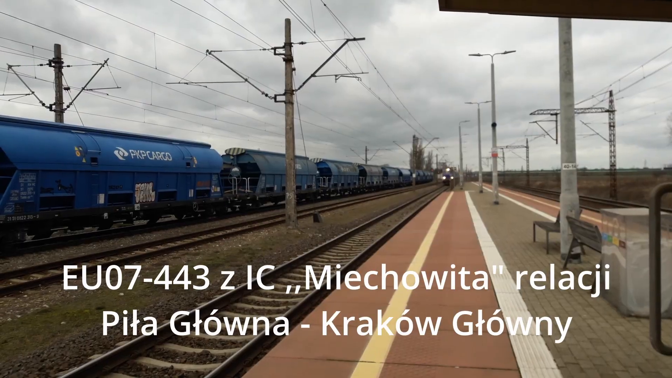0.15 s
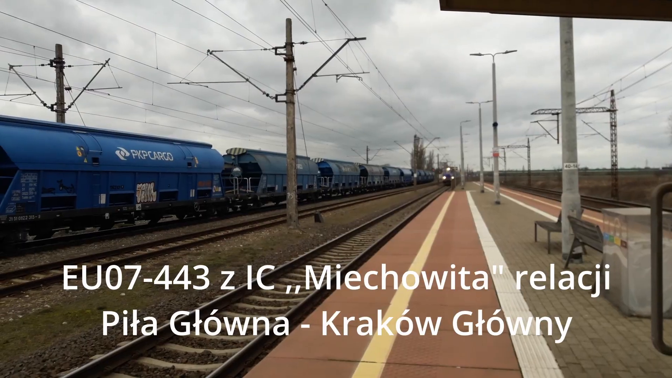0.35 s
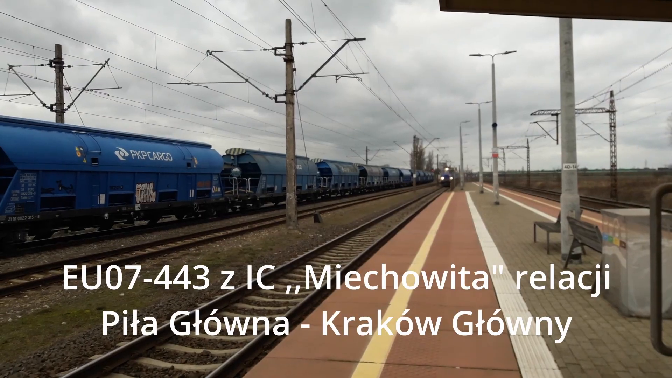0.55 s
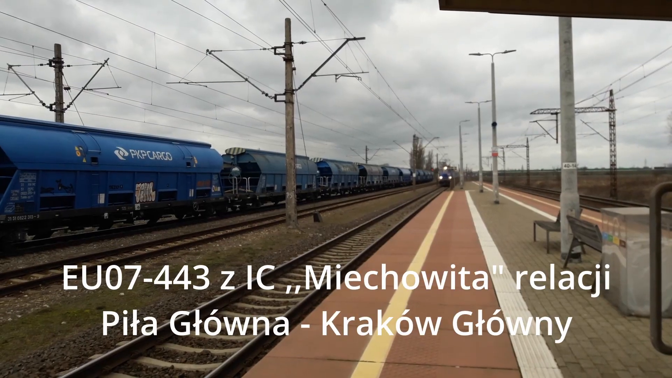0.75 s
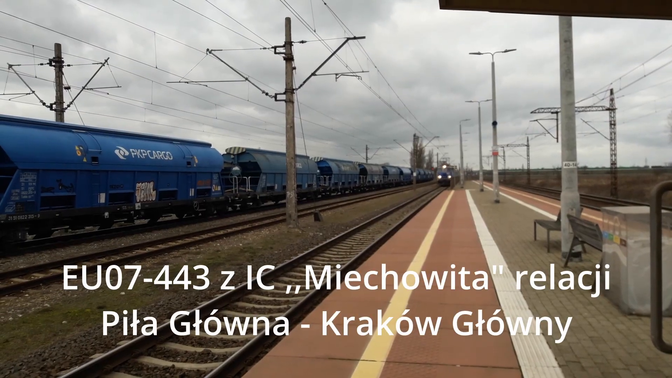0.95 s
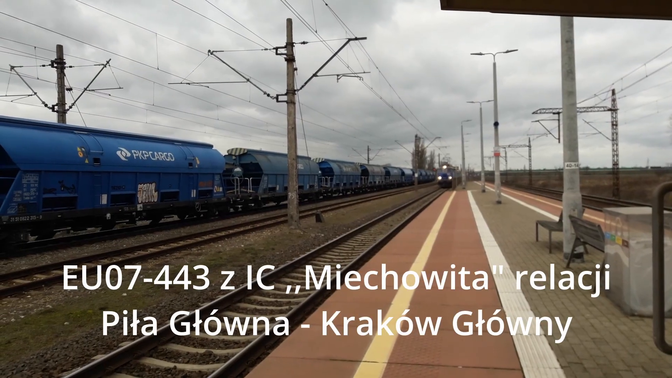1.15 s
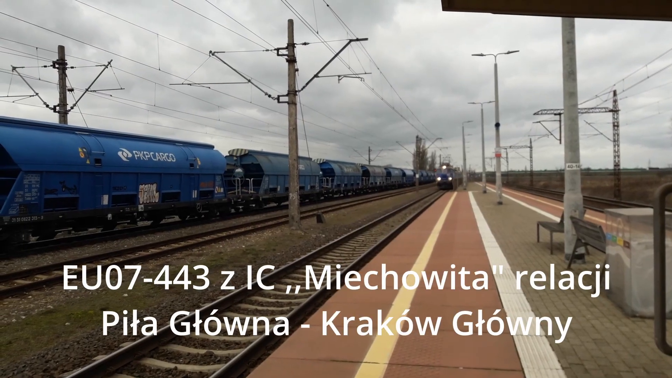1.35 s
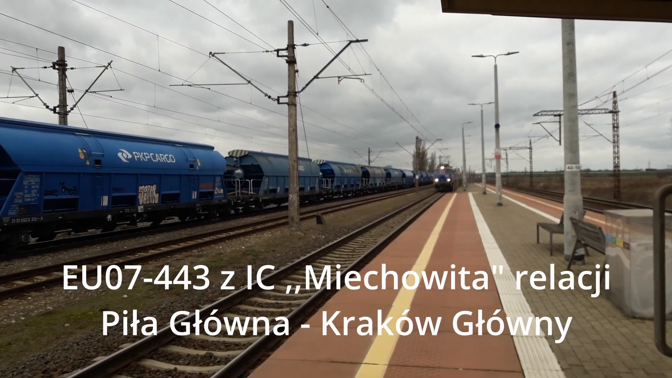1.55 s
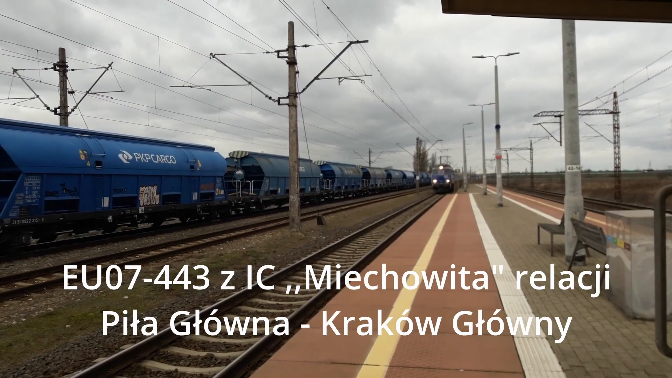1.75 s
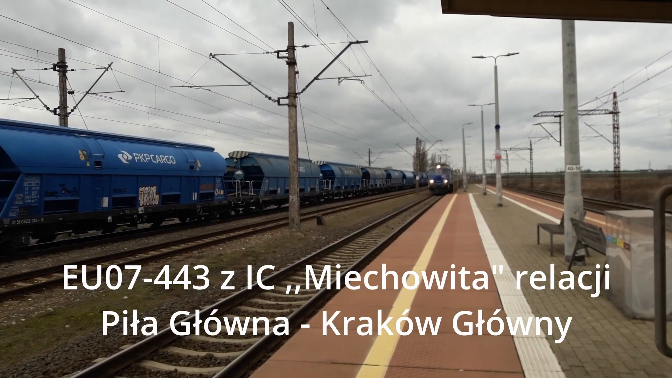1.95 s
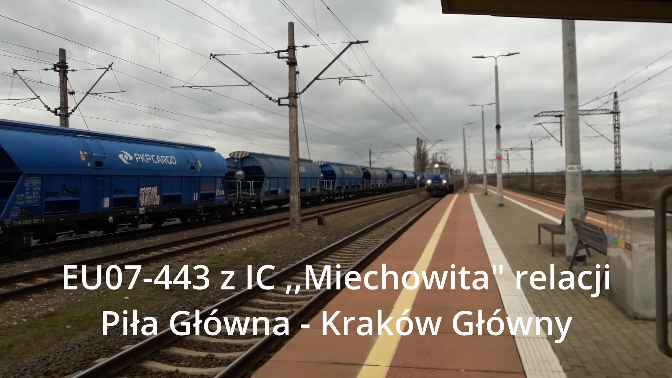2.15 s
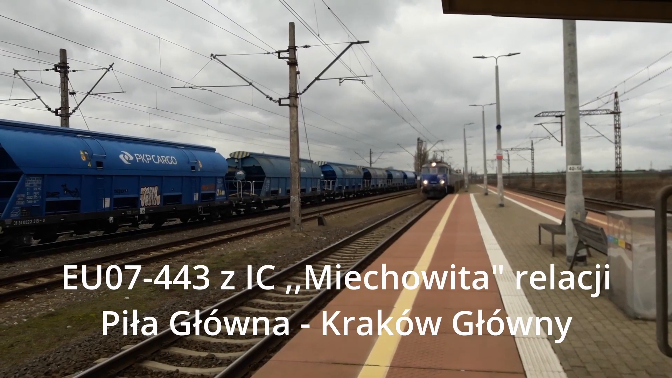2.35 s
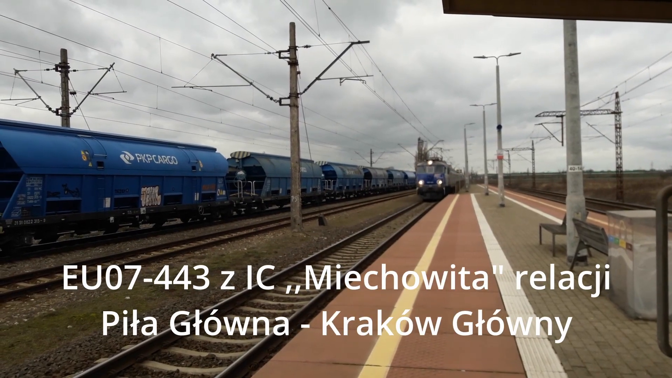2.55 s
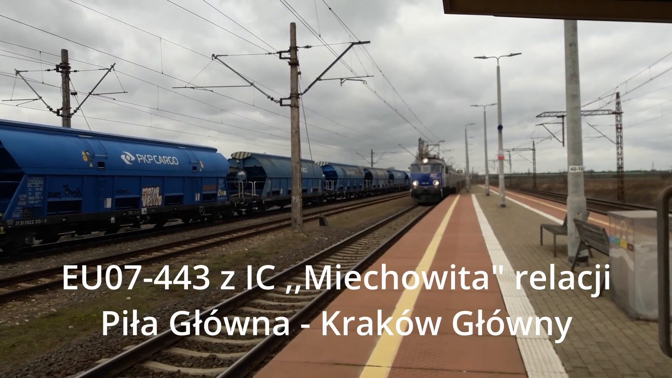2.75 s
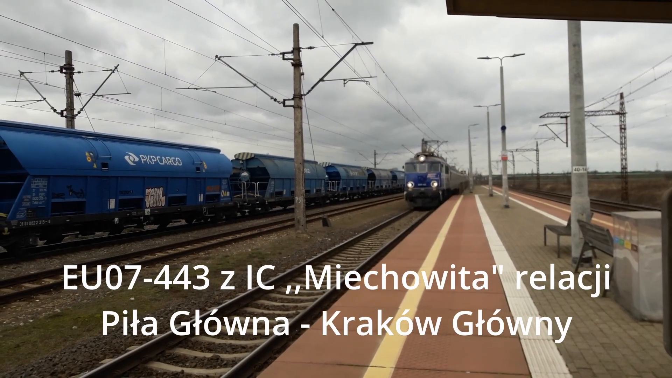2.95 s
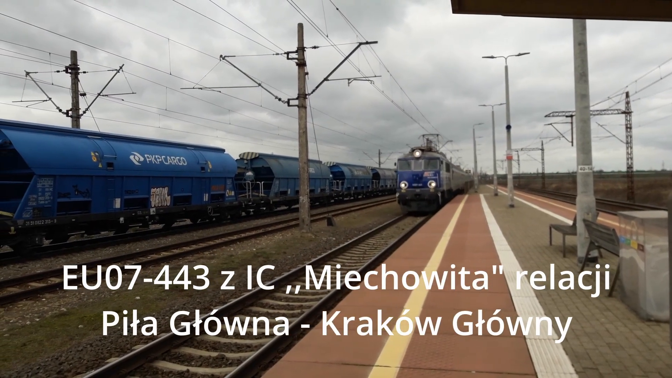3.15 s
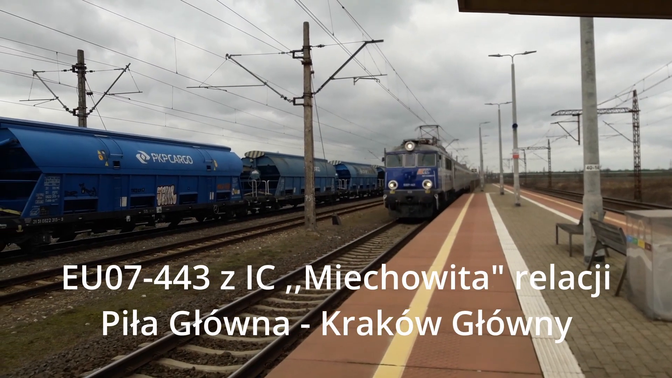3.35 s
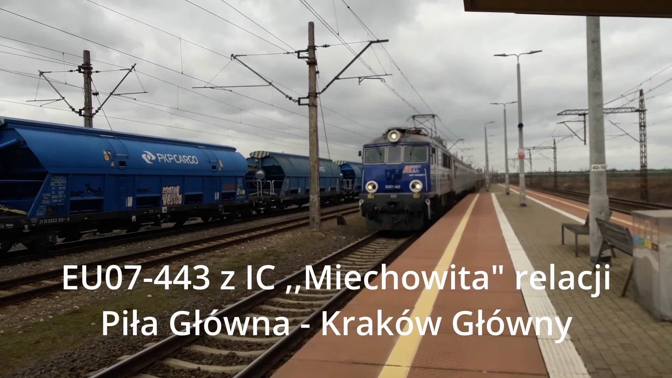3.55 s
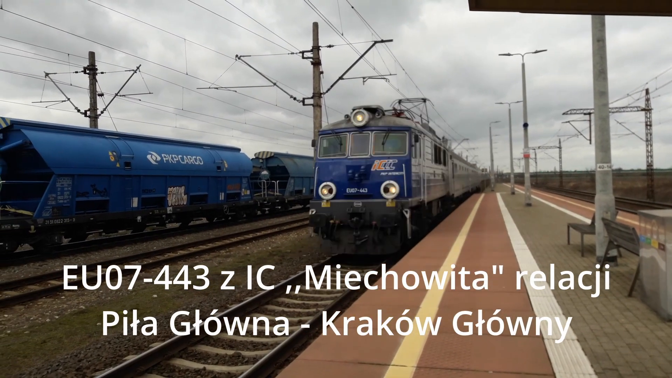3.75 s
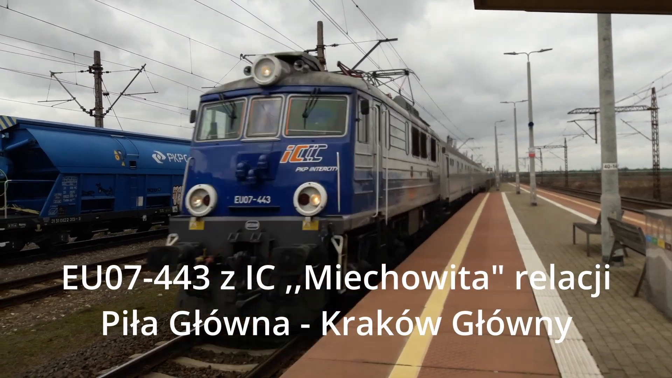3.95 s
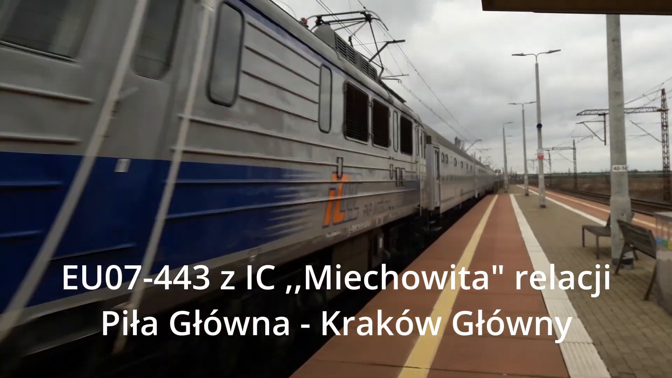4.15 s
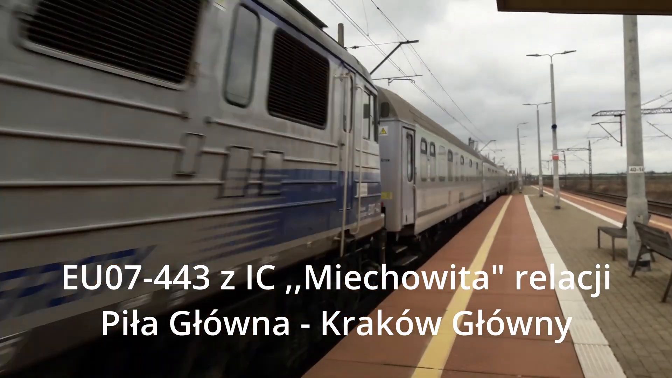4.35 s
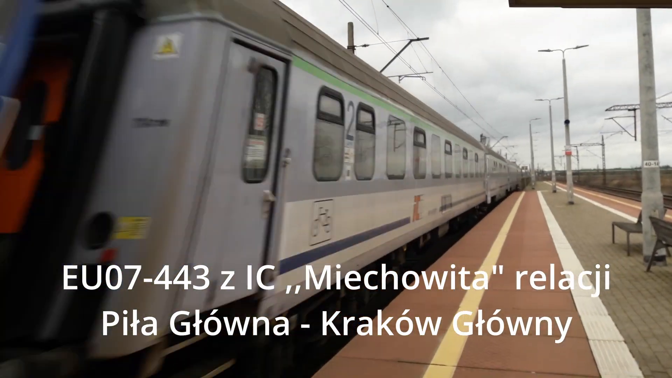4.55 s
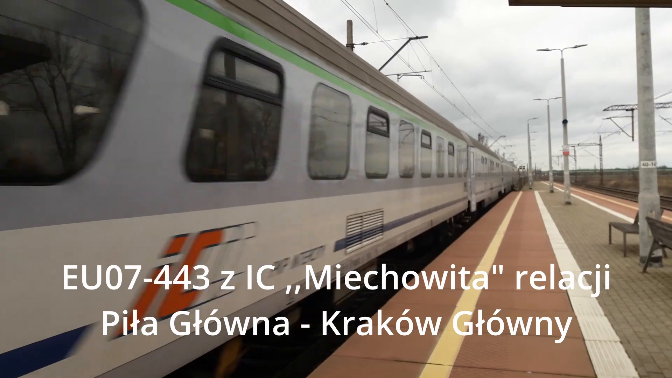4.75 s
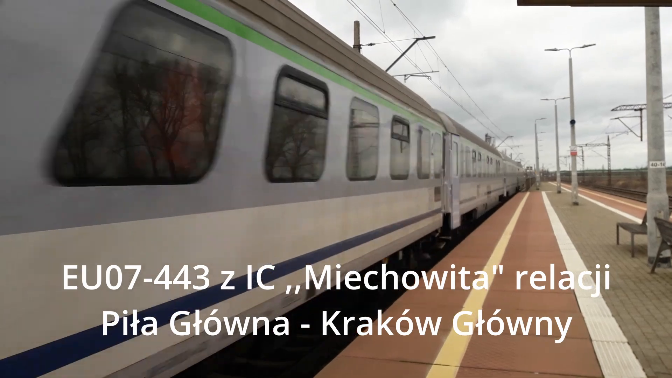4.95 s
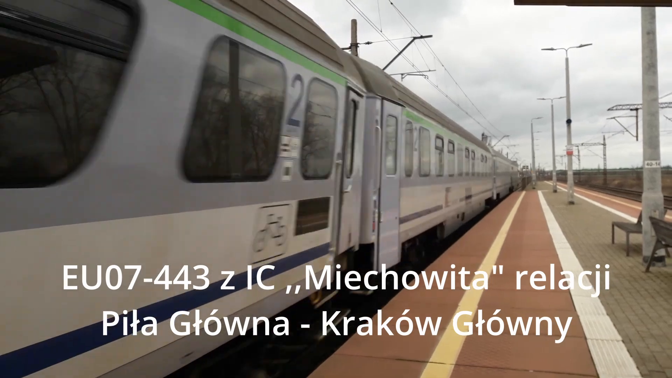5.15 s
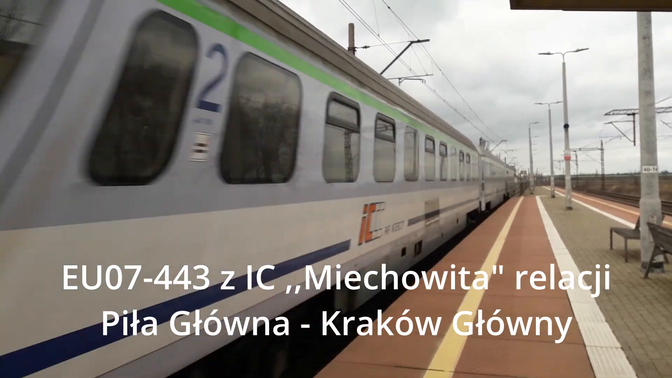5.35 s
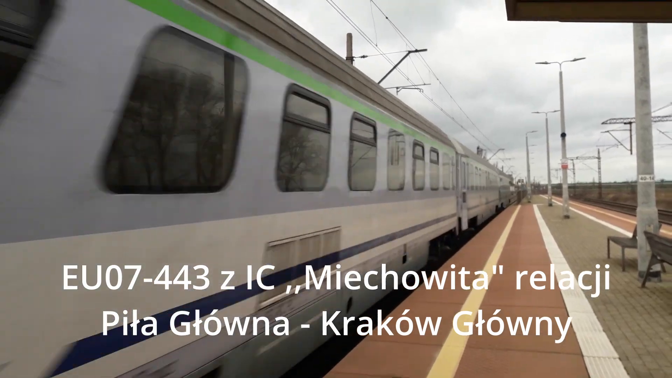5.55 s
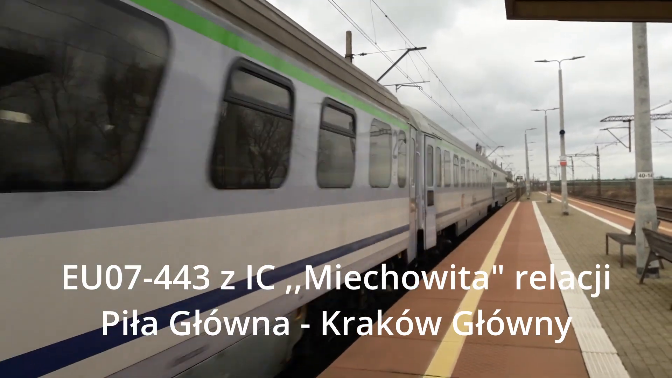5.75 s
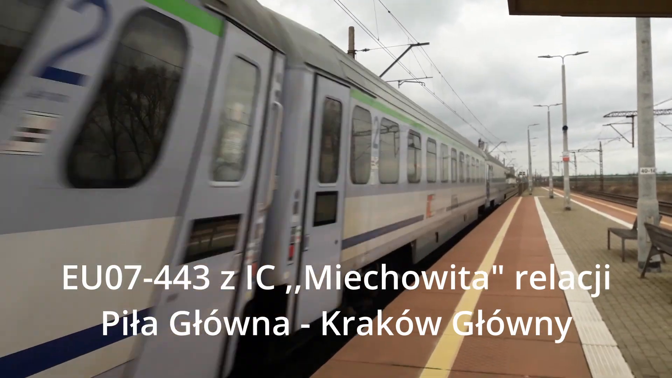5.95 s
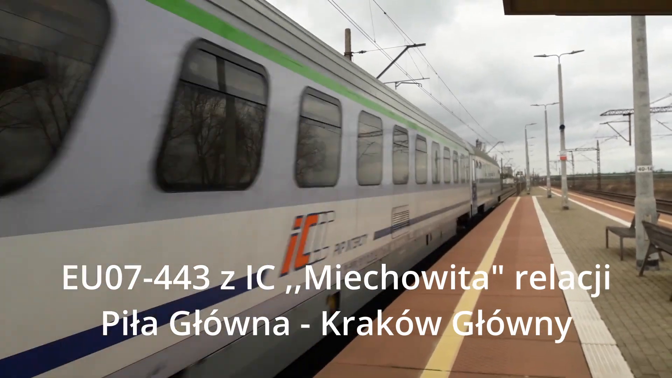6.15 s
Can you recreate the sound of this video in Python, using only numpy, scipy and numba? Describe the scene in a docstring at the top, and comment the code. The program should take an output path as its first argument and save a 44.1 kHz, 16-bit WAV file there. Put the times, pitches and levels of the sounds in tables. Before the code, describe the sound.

Outdoors on a station platform, close to the rails, centred identical sound in both channels. From 0 to 2.5 seconds a breeze rumbles softly, with sharp low thumps around 0.1-0.2, 0.6-0.7, 1.0 and 1.6. Beneath it the rails sing a thin, very high steely hiss with a faint whistle, and a distant resonant track hum grows. From 2.5 to 4 the singing thickens and the hum broadens into a rapidly rising roar. Around 4 the electric locomotive arrives; its two heavy bogies ring and growl past near 4.2-4.5, the fullest rolling moment, with pitch bending down. From 4.8 the lighter coaches roar a little less, bogies sweeping by in hissing metallic surges near 4.9, 5.4, 5.6 and in close succession from 6.0. Slipstream gusts buffet the microphone, with thuds at 4.6 and 5.4-5.6 and the hardest blow at 5.75, briefly ducking everything. It ends at about 6.4, train still passing.

```python
"""A breeze puffs and thumps at the microphone while rails sing ever louder ahead of an express that rushes past.
Filtered noise makes the breeze, the slipstream, the singing rails, the roaring track and the hiss of the bogies.
Each bogie of the electric train sweeps by about three metres away; its wheels ring as resonant noise
that travel time bends down in pitch.
Single eddies are pressure pulses, and a limiter ducks under the strongest blows."""
import sys
import numpy as np
from scipy import signal
from scipy.fft import rfft, irfft
from scipy.io import wavfile
from scipy.ndimage import uniform_filter1d, minimum_filter1d, map_coordinates
from numba import njit

SR = 44100
rng = np.random.default_rng(int(sys.argv[2]) if len(sys.argv) > 2 else 0)


def materialize(psi):
    """Save the field psi as 16-bit PCM at rate SR to the path in sys.argv[1].

    A 1-D psi becomes a single channel; in a 2-D psi each row is a channel.
    """
    bounded = np.clip(np.atleast_2d(psi).T, -1, 1)
    quanta = np.round(bounded * 32767).astype(np.int16)
    wavfile.write(sys.argv[1], SR, quanta)


N = 277830
TIME = np.arange(N) / SR  # s
FREQS = np.maximum(np.arange(N // 2 + 1) * SR / N, 1)  # Hz

SPEED = 33  # m/s
ARRIVES_S, COACHES_S = 4, 4.81  # the locomotive's nose arrives, then the first coach


def undb(db):
    """Decibels to gain."""
    return 10 ** (np.asarray(db) / 20)


def colour(points):
    """Gain per frequency through (Hz, dB) points, joined on a logarithmic frequency scale."""
    hz, db = np.transpose(points)
    return undb(np.interp(np.log(FREQS), np.log(hz), db))


def resonances(modes):
    """Gain per frequency of steep-sided resonances, added as power."""
    power = 0
    for hz, width_hz, db in modes:
        peak = undb(db) / (1 + 2 * ((FREQS - hz) / width_hz) ** 2)
        power = power + peak ** 2
    return np.sqrt(power)


def ripple(spacing_hz, depth_db):
    """Gain per frequency of many narrow, unevenly strong modes of steel."""
    grid_hz = np.arange(1024) * spacing_hz
    strength = rng.standard_normal(len(grid_hz))
    return undb(depth_db * np.interp(FREQS, grid_hz, strength))


def noise(gain):
    """Random excitation through a response, rms 1."""
    shaped = irfft(rfft(rng.standard_normal(N)) * gain, N)
    return shaped / shaped.std()


def waver(rate_hz, depth_db):
    """A gain that wanders at random, mostly slower than rate_hz; depth_db is rms."""
    coarse = TIME[::32]
    hz = np.fft.rfftfreq(len(coarse), coarse[1])
    spectrum = rfft(rng.standard_normal(len(coarse))) / (1 + (hz / rate_hz) ** 4)
    slow = irfft(spectrum, len(coarse))
    return np.interp(TIME, coarse, undb(depth_db * slow / slow.std()))


def swells(table):
    """Summed gain of rounded bursts, each at half its peak gain half a length from its middle."""
    return sum(undb(db) / (1 + (2 * (TIME - s) / length) ** 6) for s, length, db in table)


def after(s, fade_s):
    """A smooth step from 0 to 1 around time s."""
    return .5 + .5 * np.tanh((TIME - s) / fade_s)


# puffs of the breeze: middle_s, length_s, level_db
PUFFS = [(.155, 0.075, -30.5), (.54, .19, -33.5), (.86, 0.31, -35), (1.0, 0.063, -31.5),
         (1.42, 0.071, -36.5), (1.64, .12, -28), (1.8, 0.061, -33), (2.05, 0.24, -42), (2.26, 0.055, -31.5),
         (2.51, 0.05, -27.5)]
# relative spectrum of the breeze: freq_hz, level_db
WIND_COLOUR = [(20, -32), (40, -18), (65, -1), (100, 4), (150, 2), (240, -10), (400, -23), (800, -32),
               (2000, -65)]


def breeze(near):
    """Turbulence rumbles in fits: steady air, puffs, and a draught that grows with the train and lasts."""
    steady = undb(-44) * waver(10, 2.2)
    draught = undb(-33.5) * near ** 0.37
    strength = steady + draught + swells(PUFFS)
    return noise(colour(WIND_COLOUR)) * waver(33, 2.3) * strength


# gusts of the slipstream: middle_s, length_s, level_db
GUSTS = [(4.17, 0.6, -24.5), (4.65, 0.14, -12.5), (5.165, 0.028, -20.5), (5.445, 0.06, -17.5),
         (5.58, 0.16, -16.5), (5.755, 0.042, -11.5), (5.81, 0.028, -17), (6.0, 0.75, -28.5)]
# relative spectrum of the gusts: freq_hz, level_db
GUST_COLOUR = [(25, -30), (50, -6), (90, 1), (160, 1), (260, -3), (420, -6.5), (750, -8.5), (1500, -33),
               (3000, -61)]


def slipstream():
    """Turbulent air around the train buffets the microphone in bursts."""
    return noise(colour(GUST_COLOUR)) * waver(44, 2.95) * swells(GUSTS)


# single eddies that thump the microphone: middle_s, peak_db, pitch_hz
EDDIES = [(.109, -22, 110), (0.141, -16.5, 150), (0.16, -26, 200), (0.1722, -10.5, 182), (0.216, -20, 237),
          (0.602, -21, 133), (0.717, -17, 160), (0.986, -24, 200), (0.999, -15, 155), (1.641, -14, 224),
          (1.659, -18, 89), (1.967, -21, 160), (4.612, -6, 119), (5.162, -15, 190), (5.431, -7.5, 140),
          (5.529, -9, 220), (5.626, -12, 202), (5.7386, 2.5, 93), (5.749, -1, 130), (5.764, -4.5, 140)]


def eddies():
    """Each strong eddy is one push and pull of pressure."""
    thumps = np.zeros(N)
    for s, db, hz in EDDIES:
        turn = 2 * np.pi * hz * (TIME - s)
        thumps -= undb(db) * turn * np.exp((1 - turn ** 2) / 2)
    return thumps


# high waves that run far along the rails, relative levels: freq_hz, width_hz, level_db
RAIL_MODES = [(3900, 540, -14.5), (4600, 180, -16), (5580, 150, -15), (6700, 190, -8.5), (7120, 260, -9.5),
              (8650, 400, -16), (9250, 350, -7), (9570, 160, 0.5), (10100, 220, -34)]
# the highest rail waves, which carry furthest, relative levels: freq_hz, level_db
RAIL_TOP = [(7900, -37), (8500, -3), (10300, -8), (11500, -14.5), (13700, -24), (16000, -26)]
# relative spectrum of the rails when the train is near: freq_hz, level_db
RAIL_HISS = [(2500, -6), (5000, -11.5), (6100, -7.5), (7000, -8), (7700, -7.5), (8600, 0), (9600, 0.5),
             (10300, -7.5), (11500, -16.5), (13500, -29), (16000, -36)]


def rails(near):
    """Only lightly damped waves get far along the steel; the gaps between them fill as the train nears."""
    hiss_share = np.clip((near * 4.1) ** 1.6 + 0.00056, 0, .97)
    modes = ripple(45, 1.0)
    far_waves = np.hypot(resonances(RAIL_MODES), undb(-7.5) * colour(RAIL_TOP))
    singing = noise(far_waves * modes) * undb(0.46)
    hiss = noise(colour(RAIL_HISS) * modes) * undb(4.0)
    whistle = noise(resonances([(9460, 55, 0)])) * waver(13, 1.5) * undb(-14) * np.sqrt(1 - near)
    blend = np.sqrt(1 - hiss_share) * singing + np.sqrt(hiss_share) * hiss
    return (blend + whistle) * waver(30, 0.59)


# relative spectrum of the track from afar: freq_hz, level_db
TRACK_FAR = [(150, -6.5), (300, -11), (450, -20), (600, -7.5), (1000, -9.5), (1600, -7.5), (2150, -5.5),
             (2400, -19), (2750, -19.5), (3000, -40), (5000, -29), (6000, -48)]
# resonances of rails on sleepers, relative levels: freq_hz, width_hz, level_db
TRACK_MODES = [(965, 43, -15), (1088, 18, 2.5), (1163, 25, 2.5), (1240, 55, 5), (1387, 81, 1.5),
               (1950, 190, -9.5)]
# damped sleeper resonances, which come up as the train nears, relative levels: freq_hz, width_hz, level_db
SLEEPER_MODES = [(607, 160, -10), (734, 50, 3.5), (1167, 19, -7)]
# relative spectrum of the track alongside: freq_hz, level_db
TRACK_NEAR = [(80, -26), (200, -3.5), (400, -6.5), (580, -5), (800, 1), (1100, -1.5), (1330, -5),
              (1650, -2), (2150, -1.5), (2500, -10.5), (3500, -47)]


def track(near):
    """Rough wheels shake rails and sleepers: distinct resonances from afar, a broad roar alongside."""
    far_response = np.hypot(colour(TRACK_FAR), resonances(TRACK_MODES))
    far = noise(far_response) * waver(20, 0.32) * undb(3.0)
    sleepers = noise(resonances(SLEEPER_MODES)) * waver(8.8, 2.0) * (near + 0.022) ** 0.47
    close = noise(colour(TRACK_NEAR)) * waver(6.1, 0.99) * undb(0.5)
    return np.sqrt(1 - near) * (far + sleepers) + np.sqrt(near) * close


# thin fizz of the wheel contacts, in bursts: middle_s, length_s, level_db
FIZZ = [(4.08, 0.27, -40), (5.43, 0.25, -41), (6.12, 0.53, -46)]
# relative spectrum of the fizz: freq_hz, level_db
FIZZ_COLOUR = [(8000, -20.5), (11000, 1.5), (13500, -7), (15500, 1)]


def contact_fizz():
    """The wheel contacts fizz thinly in bursts of very high noise."""
    return noise(colour(FIZZ_COLOUR)) * swells(FIZZ)


ROAR_DB, ROAR_COACH_DB = -14.5, -5  # level at the locomotive, change under the lighter coaches
ROAR_REACH_M, ROAR_LOSS_DB = 14.7, 25  # length of track that radiates, loss per tenfold distance
SINGING_DB, RAIL_REACH_M = -29.5, 80.3  # level as the train arrives, distance in steel that damps to 1/e
COVERED_DB, COVER_DELAY_S = -4, 0.19  # change once the train covers the rails, this long after the nose
SINGING_FIZZ_DB, FIZZ_FULL_DB = 2.5, -46  # lift by fizzing contacts, fizz level that gives most of it


def rolling(distance_m, near):
    """The roar spreads through the air and weakens with distance; steel damps the singing metre by metre."""
    spreading_db = ROAR_LOSS_DB * np.log10(np.hypot(1, distance_m / ROAR_REACH_M))
    roar_db = ROAR_DB - spreading_db + ROAR_COACH_DB * after(COACHES_S, 0.11)
    covered = after(ARRIVES_S + COVER_DELAY_S, .06)
    fizzing = np.tanh(swells(FIZZ) / undb(FIZZ_FULL_DB))
    singing_db = SINGING_DB + COVERED_DB * covered + SINGING_FIZZ_DB * fizzing
    singing_gain = undb(singing_db) * np.exp(-distance_m / RAIL_REACH_M)
    return track(near) * undb(roar_db) + rails(near) * singing_gain


# relative spectrum of the hiss around the bogies: freq_hz, level_db
RUSH_COLOUR = [(1200, -17.5), (2300, 1), (3200, 1.5), (4200, -2.5), (5500, -6.5), (6600, -15),
               (9000, -13.5), (11500, -32), (13500, -35), (15500, -32)]
RUSH_LEAD_M = 8  # the hiss peaks this far before a bogie is abreast
RUSH_LOCO_M, RUSH_COACH_M, RUSH_BEHIND_M = 13.4, 4.4, 10.9  # fades: ahead of loco, of coach, behind either


def rush(fall=1.77):
    """Wheels and air hiss from every bogie: it swells as the bogie nears and fades behind it."""
    power = 0
    for bogies, ahead_m in (LOCO_BOGIES, RUSH_LOCO_M), (COACH_BOGIES, RUSH_COACH_M):
        for abreast_s, *_, hiss_db in bogies:
            along_m = SPEED * (TIME - abreast_s) + RUSH_LEAD_M
            reach_m = np.where(along_m < 0, ahead_m, RUSH_BEHIND_M)
            power = power + undb(hiss_db) ** 2 / (1 + (along_m / reach_m) ** 2) ** fall
    return noise(colour(RUSH_COLOUR)) * waver(36, 0.12) * np.sqrt(power)


TRACK_OFFSET_M, SOUND_SPEED = 3.2, 343  # closest distance, m/s
WHEEL_TONE_HZ, WHEEL_TONE_WIDTH_HZ = 2090, 132  # upper wheel tone, before each bogie's pitch ratio


def bogie(abreast_s, ring_db, pitch_ratio, tone_db, modes, lead_m, reach_m):
    """Ringing wheels go by: travel time bends their pitch, and they are loudest just before they are abreast."""
    along_m = SPEED * (TIME - abreast_s)
    extra_path_m = np.hypot(along_m, TRACK_OFFSET_M) - TRACK_OFFSET_M
    arrival = TIME + extra_path_m / SOUND_SPEED
    emitted = np.interp(TIME, arrival, TIME)  # when the sound heard now left the wheels
    wheel_tone = (WHEEL_TONE_HZ, WHEEL_TONE_WIDTH_HZ, tone_db)
    wheels = resonances([*modes, wheel_tone]) * ripple(25.1, 1.8)
    ring = noise(wheels) * waver(23, 0.64)
    heard = map_coordinates(ring, [emitted * pitch_ratio * SR + SR], order=3, mode="wrap")
    # the platform edge screens the wheels once they are some way off
    past_peak_m = SPEED * (emitted - abreast_s) + lead_m
    spread = (1 + (past_peak_m / reach_m) ** 2) ** -.85
    return heard * spread * undb(ring_db)


# bogies of the locomotive, tone_db relative to the modes: abreast_s, ring_db, pitch_ratio, tone_db, hiss_db
LOCO_BOGIES = [(4.31, -8.5, 0.98, 5, -24.5), (4.52, -10, .94, 2.5, -19.5)]
# bogies of the coaches, tone_db relative to the modes: abreast_s, ring_db, pitch_ratio, tone_db, hiss_db
COACH_BOGIES = [(4.97, -18, .92, -4, -26.5), (5.49, -13.5, .99, -31, -22.5),
                (5.68, -17.5, 1.02, -21, -24.5), (6.12, -14.5, .99, -8.5, -23.5),
                (6.27, -15.5, .95, -4, -21), (6.42, -14, .88, 2, -23)]
# locomotive running gear before pitch ratio and motion, relative levels: freq_hz, width_hz, level_db
LOCO_MODES = [(250, 116, 0), (540, 170, -4.5), (652, 51, 1), (1110, 51, -1), (1353, 175, 1),
              (1810, 120, -1.5)]
# coach running gear before pitch ratio and motion, relative levels: freq_hz, width_hz, level_db
COACH_MODES = [(328, 230, -19), (790, 200, -9), (1080, 130, -6), (1527, 230, 1.5), (1730, 73, -3.5)]
RING_LEAD_LOCO_M, RING_LEAD_COACH_M = 3.8, 7.2  # the ring peaks this far before abreast
RING_REACH_M = 5.53  # and fades over this distance


def running_gear():
    """Two heavy motor bogies ring past, then the lighter ones of the coaches."""
    gear = np.zeros(N)
    for *ring, _ in LOCO_BOGIES:
        gear += bogie(*ring, LOCO_MODES, RING_LEAD_LOCO_M, RING_REACH_M)
    for *ring, _ in COACH_BOGIES:
        gear += bogie(*ring, COACH_MODES, RING_LEAD_COACH_M, RING_REACH_M)
    return gear


NEAR_M, NEAR_FALL = 16.3, 1.16  # the train sounds near within this distance; how steeply that fades beyond


def scene():
    """The train closes in at a steady speed; all sources at one microphone, the same in both channels."""
    distance_m = SPEED * np.maximum(ARRIVES_S - TIME, 0)  # to the nose; 0 once it has arrived
    near = np.clip((1 + (distance_m / NEAR_M) ** 2) ** -NEAR_FALL, 0, 1)
    wind = breeze(near) + slipstream() + eddies()
    train = rolling(distance_m, near) + contact_fizz() + rush() + running_gear()
    return np.tile(wind + train, (2, 1))


@njit
def hold(size, release):
    """Peak follower: instant to rise, slow to fall."""
    out, level = np.empty(len(size)), 0.
    for i in range(len(size)):
        level = max(size[i], level * release)
        out[i] = level
    return out


def record(dry, low_cut_hz=40, ceiling_db=-0.3, release_s=0.035, top_hz=15680):
    """The microphone sheds the deepest bass, a limiter holds down the peaks, then the top is cut."""
    low_cut = signal.butter(2, low_cut_hz, "high", fs=SR, output="sos")
    sound = signal.sosfilt(low_cut, dry)
    peak = hold(np.abs(sound[0]), np.exp(-1 / (release_s * SR)))
    gain = 1 / np.maximum(peak / undb(ceiling_db), 1)
    # the limiter looks ahead, so it is already down when a peak comes
    gain = uniform_filter1d(minimum_filter1d(gain, size=129), size=129)
    top_cut = signal.ellip(12, .1, 80, top_hz, fs=SR, output="sos")
    return signal.sosfilt(top_cut, sound * gain)


dry = scene()
out = record(dry)
materialize(out)
```